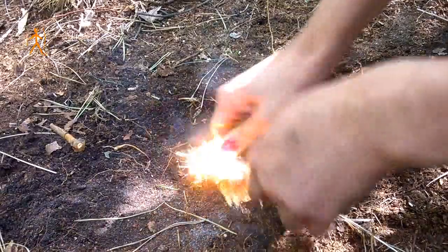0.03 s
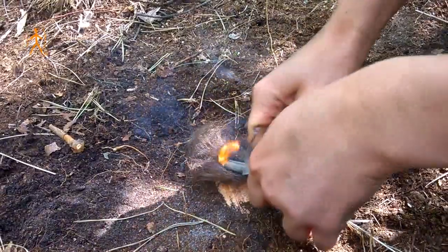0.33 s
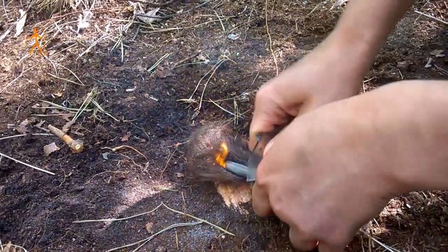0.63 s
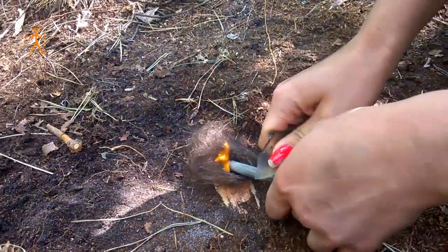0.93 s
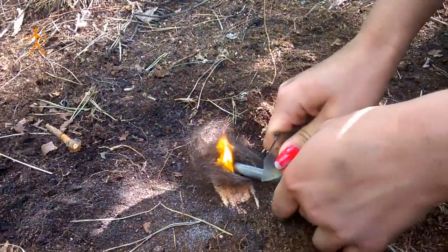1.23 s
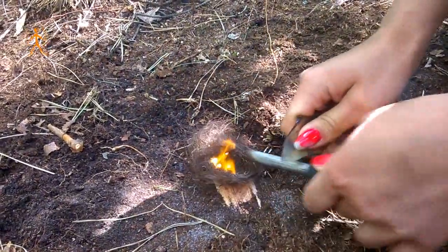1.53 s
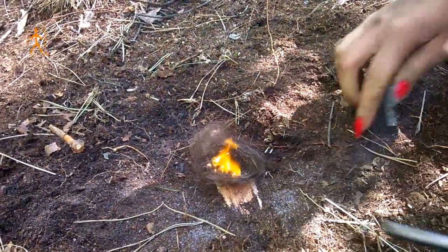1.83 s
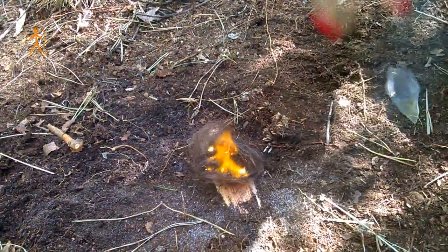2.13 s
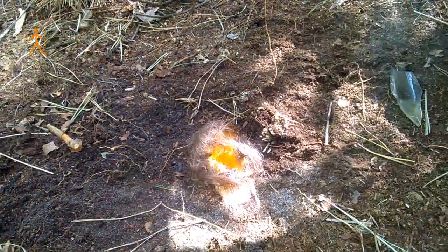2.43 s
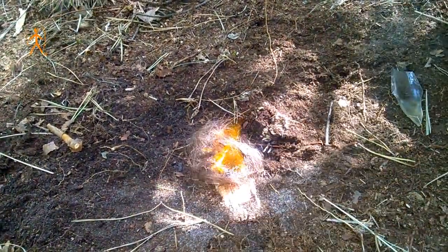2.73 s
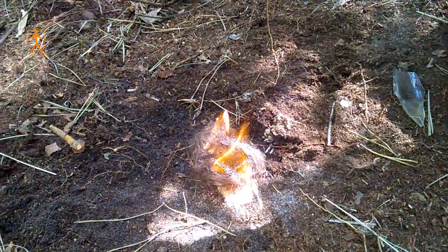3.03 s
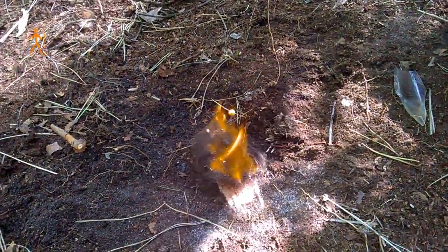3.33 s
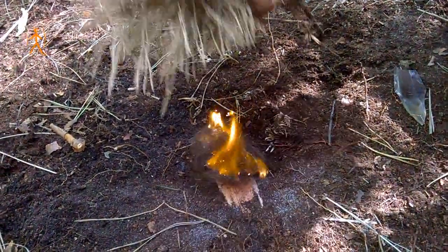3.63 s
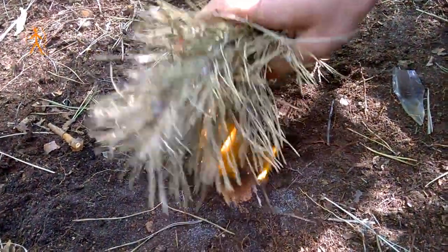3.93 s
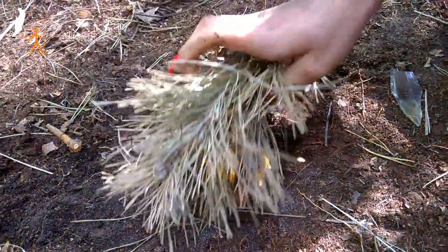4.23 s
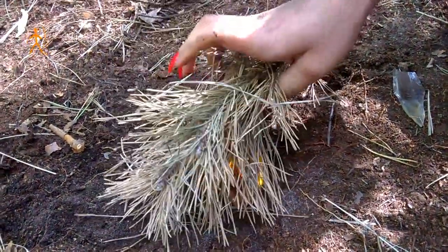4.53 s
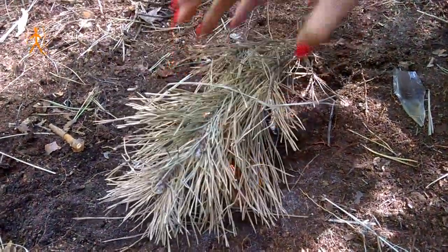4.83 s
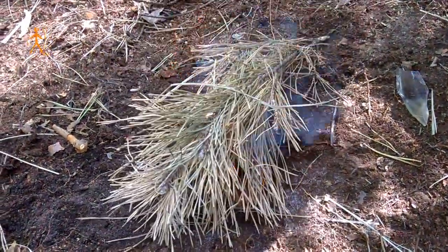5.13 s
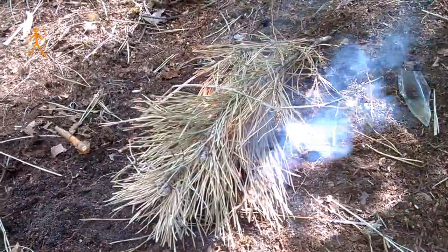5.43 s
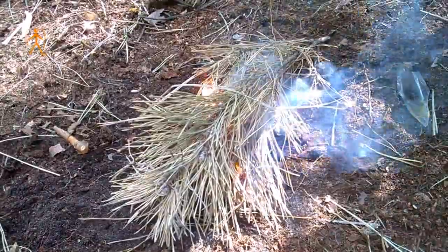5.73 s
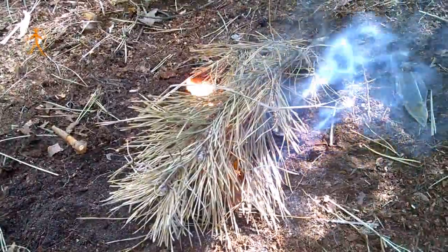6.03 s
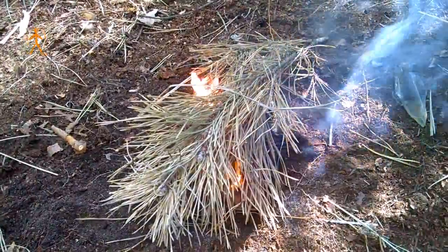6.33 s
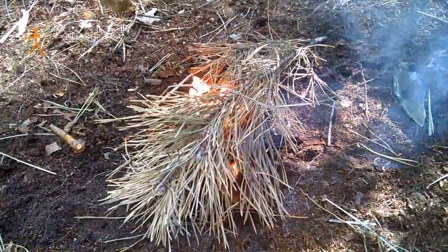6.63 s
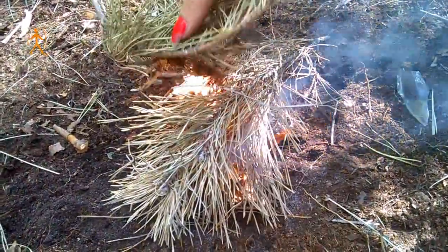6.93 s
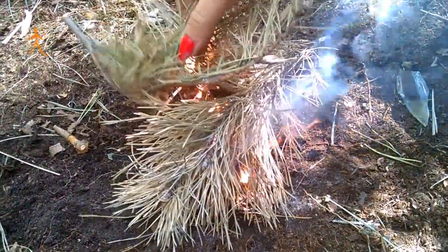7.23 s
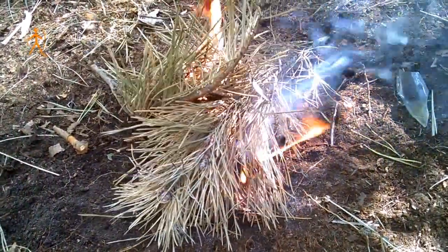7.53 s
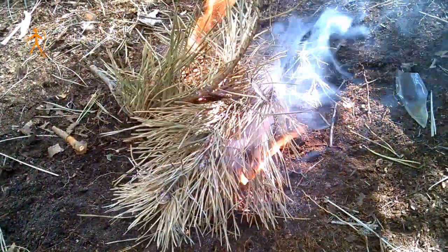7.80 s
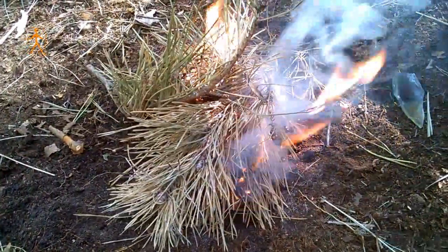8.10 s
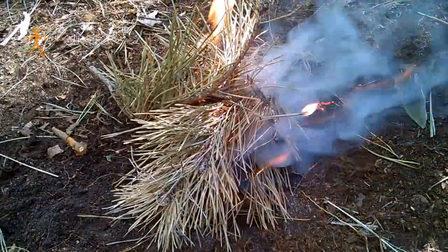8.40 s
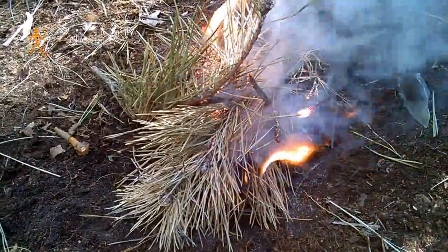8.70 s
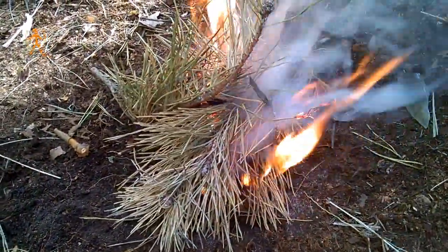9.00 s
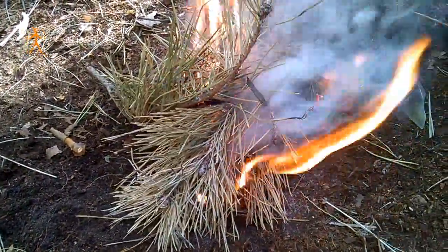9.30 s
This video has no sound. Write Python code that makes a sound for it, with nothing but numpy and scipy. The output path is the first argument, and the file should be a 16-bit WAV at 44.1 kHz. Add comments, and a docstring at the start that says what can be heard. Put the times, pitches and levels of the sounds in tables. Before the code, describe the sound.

In a quiet forest, a fire steel is struck once right by the microphone, with a few lighter scrapes and clicks after it. A hushed stretch follows, with softly hissing tinder and a far-off bird. Then pine needles begin to snap and pop, the crackle thickening as the flames flutter and sap sputters, while a bird sings a falling phrase among the trees.

```python
"""Lighting a fire on the forest floor

Close to one microphone, a blade scrapes a fire steel, ringing the rod, and lights a nest of tinder.
Dry conifer twigs laid on it catch: needles pop, sap spits, and puffs of gas make the flames flutter
ever more often. Back among the trees a bird whistles a falling phrase and another calls far off,
over still air and a faint low drone."""
import sys
import numpy as np
from scipy import signal
from scipy.fft import rfft, irfft, next_fast_len
from scipy.io import wavfile
from scipy.ndimage import uniform_filter1d

SR = 44100
rng = np.random.default_rng(int(sys.argv[2]) if len(sys.argv) > 2 else 0)


def inscribe(sig):
    """Save sig as 16-bit PCM at rate SR to the path in sys.argv[1].

    A 1-D sig is mono; a 2-D sig holds one channel per row.
    Samples are clipped to [-1, 1] before scaling.
    """
    pcm = np.round(np.clip(np.atleast_2d(sig).T, -1, 1) * 32767)
    wavfile.write(sys.argv[1], SR, pcm.astype(np.int16))


N = 412776
TIME = np.arange(N) / SR
TWIGS_LAID_S, CATCH_START_S, CATCH_END_S = 4.15, 4.6, 7.3   # the twigs smoulder, then the fire spreads

# still air among the trees: f/Hz, level/dB
AIR_SPECTRUM = [(200, -7.5), (400, -9), (1000, -4), (2000, -6), (2800, -4.5), (3800, -4), (5100, 0.5),
                (6200, -12.5), (8500, -19.5), (16000, -28)]
# song, in runs of like syllables: t/s, count, period/s, length/s, start, middle and end f/Hz, level/dB
SONG_RUNS = [(6.205, 1, .2, .055, 6150, 5850, 5150, -66), (6.32, 2, .2, .13, 4800, 5300, 4300, -63.5),
             (6.74, 3, .195, .075, 6450, 5150, 4250, -62), (7.305, 3, .171, .093, 3820, 4060, 3660, -54),
             (7.83, 2, .178, .088, 4850, 3680, 2950, -63)]
# the distant bird: t/s, length/s, start, middle and end f/Hz, level/dB
FAR_SYLLABLES = [(.64, 0.14, 4590, 5150, 4930, -63.5), (.81, 0.056, 5400, 5020, 4660, -63.5),
                 (2.61, 0.121, 4630, 5200, 4970, -61), (2.78, 0.049, 5400, 5100, 4430, -60)]

# vigour of the flames: t/s, level/dB
VIGOUR = [(0.6, -78), (1.4, -76), (1.94, -67.5), (2.31, -70), (4.77, -64.5), (5.19, -71), (5.67, -75.5),
          (7.45, -61), (8.84, -65), (9.36, -61)]
# low rumble of flames and air: f/Hz, level/dB
RUMBLE_SPECTRUM = [(15, -7), (35, 2.5), (75, -2), (140, -5.5), (220, -10), (400, -22.5), (1500, -47)]
# rush of the flames: f/Hz, level/dB
RUSH_SPECTRUM = [(200, -12), (280, -0.5), (380, 2), (700, 2), (980, 3), (1300, -3.5), (1650, -3),
                 (2000, -2.5), (2800, -14), (3900, -3), (5600, -12.5), (7000, -8.5), (8500, -36)]
# fine hiss of the fuel: f/Hz, level/dB
HISS_SPECTRUM = [(3000, -8), (4000, 12.5), (5600, 8), (7000, 10), (8200, 0), (9300, 1.5), (10800, -4),
                 (13000, 6.5), (14500, 7), (16000, -1.5)]
# the tinder flares, then the needles steam: peak t/s, rise/s, fall/s, level/dB
HISS_SWELLS = [(4.3, 2.9, 1, -68), (6.2, 0.19, 0.18, -69)]
# the biggest pockets of gas catching: middle t/s, length/s, flutter level/dB, thud level/dB
BIG_PUFFS = [(4.913, 0.0049, -51, -41), (5.488, .007, -60, -53), (5.737, 0.0081, -57.5, -53),
             (6.293, 0.0095, -54.5, -41.5), (6.594, 0.012, -54, -53), (6.728, 0.021, -57, -51),
             (6.813, 0.031, -47.5, -45.5), (7.139, 0.019, -56, -42.5), (7.284, 0.044, -52, -46),
             (7.456, 0.0073, -48.5, -47), (7.806, 0.0034, -45.5, -40), (7.856, 0.016, -62, -43.5),
             (8.121, 0.0077, -56, -40.5), (8.2, 0.021, -51, -44.5), (8.443, 0.012, -51.5, -48),
             (8.524, 0.021, -51, -50), (8.821, 0.0052, -51, -41.5), (8.988, 0.024, -50.5, -50.5),
             (9.286, 0.061, -54, -47.5)]
# flutter of a puff: f/Hz, level/dB
FLUTTER_SPECTRUM = [(120, -2), (280, -3), (400, -1.5), (550, 2.5), (750, -5.5), (1020, 0.5), (1300, -16),
                    (2000, -12), (2700, -35), (6000, -45)]
# thud under a puff: f/Hz, level/dB
THUD_SPECTRUM = [(25, -3.5), (60, -5), (110, 4), (200, -3), (320, -11.5), (700, -55)]
# steam from burst needles: middle t/s, length/s, level/dB, f/Hz
STEAM_SPITS = [(8.88, .014, -59, 7900), (9.076, 0.023, -51.5, 6240), (9.269, 0.006, -38, 4030),
               (9.27, 0.066, -50.5, 4030)]
# the loudest needles bursting: t/s, crack level/dB, ring f/Hz, knock level/dB
NEEDLE_POPS = [(4.2413, -55.5, 3900, -58), (4.373, -60, 4300, -67), (4.7515, -61, 4300, -57.5),
               (4.811, -61, 4860, -54), (4.8441, -48, 3840, -43), (4.8843, -48.5, 4300, -47),
               (4.901, -50.5, 4580, -58), (4.9097, -50.5, 4170, -54), (5.0669, -41.5, 4230, -49),
               (5.182, -52.5, 3980, -61), (5.7378, -52, 4230, -60), (5.7708, -59.5, 5260, -71),
               (5.876, -58.5, 4500, -56.5), (6.1145, -52, 4370, -58), (6.1864, -44, 5900, -80),
               (6.2883, -42.5, 5150, -75), (6.5195, -58, 6500, -78), (6.6037, -49, 4160, -51.5),
               (6.817, -45, 6000, -51.5), (6.9682, -48.5, 4430, -64), (6.9809, -49.5, 4200, -57.5),
               (7.135, -47.5, 4130, -56), (7.2955, -44, 4140, -54.5), (7.3815, -55, 4100, -64),
               (7.5353, -45.5, 3800, -56), (7.6812, -46, 4100, -69), (7.689, -44.5, 4300, -75),
               (7.799, -48, 3930, -54), (7.8434, -40, 4700, -52.5), (8.2602, -49.5, 3900, -49),
               (8.4873, -47.5, 4720, -55), (8.8157, -55, 6440, -48), (8.86, -30.5, 5600, -61),
               (8.893, -47, 6430, -67), (9.0472, -49.5, 4970, -55.5), (9.0766, -45.5, 5470, -56),
               (9.2157, -45, 4800, -48), (9.2681, -58, 3900, -53)]
# crack of a needle: f/Hz, level/dB
CRACK_SPECTRUM = [(1500, -4.5), (2700, -12), (3300, -0.5), (4200, 2), (5400, -6.5), (6600, -2),
                  (8000, -7.5), (9200, -7), (11000, -12.5), (15000, -14.5)]
# woody knock under a pop: f/Hz, level/dB
KNOCK_SPECTRUM = [(150, -17), (500, -2.5), (750, -5), (1000, 2), (1300, -3.5), (1600, -3), (2050, -1),
                  (2700, -9.5), (5000, -36)]

# one push down the rod, then two grazes: slip-off t/s, level/dB
BLADE_STROKES = [(.211, -21), (0.342, -43.5), (.683, -59)]
# rasp of a stroke: f/Hz, level/dB
RASP_SPECTRUM = [(250, -25.5), (550, -18.5), (1000, -5.5), (1400, -11), (2000, -7.5), (2800, -33),
                 (3400, -10.5), (4300, -4), (4900, -3.5), (5600, -17.5), (7200, -12.5), (8200, -18),
                 (9400, -13.5), (16000, -34.5)]
# resonances of rod and blade: f/Hz, width/Hz, level/dB
ROD_MODES = [(2000, 70, -12), (2650, 70, -13.5), (3290, 57, -7.5), (3700, 25, -5), (4360, 35, -8)]
# the blade sliding lightly back up: start t/s, end t/s, level/dB, first and last squeak f/Hz
BLADE_SLIDES = [(-.02, 0.033, -56.5, 2007, 2501), (0.318, 0.507, -51.5, 1202, 2654)]
# rub of the sliding blade: f/Hz, level/dB
RUB_SPECTRUM = [(290, -72), (500, -34.5), (1060, -5.5), (1310, -20), (1530, -9), (2070, -6), (2320, -9),
                (3420, -10.5), (4100, -3), (5420, -24), (6780, -21.5), (7900, -32), (10600, -50),
                (14000, -46.5)]
# the blade catching on the rod: t/s, level/dB, ring f/Hz
BLADE_CATCHES = [(0.2113, -20.5, 4300), (.328, -35.5, 4560), (0.3382, -47, 1310), (.3415, -47.5, 4360),
                 (0.3733, -37.5, 1290), (0.424, -50, 2020), (.488, -48, 3300), (0.5168, -38.5, 1710)]
# the hand meeting the ground: f/Hz, level/dB
BUMP_SPECTRUM = [(20, -2), (45, -4), (75, -16.5), (150, -2), (260, -15), (600, -28.5)]


def from_db(db):
    """Decibels to gain."""
    return 10 ** (np.asarray(db) / 20)


def rms_one(x):
    """Scale to an rms of 1."""
    return x / np.sqrt(np.mean(x ** 2) + 1e-20)


def at_level(hit, db):
    """Scale a short hit so that its energy, spread over 5 ms, has this level."""
    return hit * from_db(db) * np.sqrt(.005 * SR / np.sum(hit ** 2))


def add(track, s, sound):
    """Mix a sound into the track from time s."""
    start = int(np.clip(s * SR, 0, N - 1))
    track[start:start + len(sound)] += sound[:N - start]


def colour(x, spectrum):
    """Causal (minimum-phase) filter with the given spectrum."""
    size = 2 * next_fast_len(len(x) // 2 + 1024)
    hz, db = np.transpose(spectrum)
    log_hz = np.log(np.maximum(np.arange(size // 2 + 1) * SR / size, 1))
    cepstrum = irfft(np.log(from_db(np.interp(log_hz, np.log(hz), db))))
    cepstrum[1:size // 2] *= 2
    cepstrum[size // 2 + 1:] = 0
    return irfft(rfft(x, size) * np.exp(rfft(cepstrum)))[:len(x)]


def noise(spectrum):
    """Steady coloured noise of rms 1."""
    return rms_one(colour(rng.standard_normal(N), spectrum))


def drift(per_s):
    """A random wander of rms 1, with `per_s` new values a second."""
    knots = rng.standard_normal(int(N / SR * per_s) + 2)
    return rms_one(np.interp(TIME * per_s, np.arange(len(knots)), knots))


def tone(hz):
    """A sine that follows a pitch curve."""
    return np.sin(2 * np.pi * np.cumsum(hz) / SR)


def swell(s, width_s):
    """A bell-shaped rise and fall around time s."""
    return np.exp(-np.minimum(((TIME - s) / width_s) ** 2, 100))


def resonance(x, hz, width_hz):
    """Two-pole resonance with a peak gain of 1."""
    r = np.exp(-np.pi * width_hz / SR)
    poles = [1, -2 * r * np.cos(2 * np.pi * hz / SR), r * r]
    return signal.lfilter(np.array([1, 0, -1]) * (1 - r * r) / 2, poles, x)


def snap(splinter_db, decay_s, size=1024):
    """One sharp break followed by a dying spray of splinters."""
    x = from_db(splinter_db) * rng.standard_normal(size) * np.exp(-TIME[:size] / decay_s)
    x[0] += rng.choice([-1, 1])
    return x


def grit(per_s, spread_db):
    """Dense clicks of uneven size."""
    sizes = from_db(spread_db * np.minimum(rng.exponential(1, N), 3))
    return (rng.random(N) < per_s / SR) * sizes * rng.choice([-1, 1], N)


def scatter(x, t60):
    """A diffuse tail of many small reflections, as strong as the sound itself."""
    tail = rng.standard_normal(SR) * from_db(-60 * TIME[:SR] / t60)
    return signal.fftconvolve(x, tail / np.sqrt(np.sum(tail ** 2)))[:N]


def as_twigs_catch(before, after):
    """Move from one value to the other while the fire spreads through the twigs."""
    return np.interp(TIME, [CATCH_START_S, CATCH_END_S], [before, after])


def chance_moments(per_s):
    """Random sample positions at the given rate, once the twigs lie on the flame."""
    return np.flatnonzero((rng.random(N) < per_s / SR) & (TIME > TWIGS_LAID_S))


def forest_air():
    """Still air all round the microphone and a wavering drone far away."""
    drone = rms_one(tone(hz=53.8 + 1.576 * drift(18)))
    air = from_db(-69.5) * noise(AIR_SPECTRUM) + from_db(-65.5) * noise(RUMBLE_SPECTRUM)
    return air + from_db(-63.5 + 2.6 * drift(11)) * drone


def whistles(syllables, rasp):
    """Each syllable bends through three pitches; rasp (0-1) spreads its line into a buzzy band."""
    out = np.zeros(N)
    waver = 1 + .006 * drift(200)
    buzz = np.sqrt(1 - rasp) + np.sqrt(rasp) * drift(950)
    for s, length, *pitches_hz, db in syllables:
        progress = np.linspace(0, 1, int(length * SR))
        span = int(s * SR) + np.arange(len(progress))
        bend_hz = uniform_filter1d(np.interp(progress, [0, .4, 1], pitches_hz), size=len(span) // 4)
        breath = np.sqrt(2 * np.abs(np.sin(np.pi * progress)))
        add(out, s, from_db(db) * breath * buzz[span] * tone(bend_hz * waver[span]))
    return out


def birds():
    """One bird sings among the trunks; the far one reaches the microphone only as echo."""
    song = [(s + k * period, *shape) for s, count, period, *shape in SONG_RUNS for k in range(count)]
    clear, husky = whistles(song, rasp=0), whistles(song, rasp=.75)
    far = whistles(FAR_SYLLABLES, rasp=.86)
    fading = from_db(-1 + 2.5 * drift(70))   # paths of unequal length make the song fade in and out
    echoes = from_db(-.7) * scatter(husky, t60=.5) + from_db(-1.5) * scatter(far, t60=.55)
    return fading * clear + echoes


def flames():
    """Rumble, rush and fine hiss; the flame grows deeper and unsteady once the twigs burn."""
    flicker_db = as_twigs_catch(.8, 2.5) * drift(70)
    blaze_db = np.interp(TIME, *np.transpose(VIGOUR)) + flicker_db
    rumble = from_db(blaze_db + as_twigs_catch(3.5, 8)) * noise(RUMBLE_SPECTRUM)
    rush = from_db(blaze_db + as_twigs_catch(.5, -1)) * noise(RUSH_SPECTRUM)
    flares = sum(from_db(db) * swell(s, np.where(TIME < s, rise, fall))
                 for s, rise, fall, db in HISS_SWELLS)
    twig_gain = from_db(as_twigs_catch(-95.5, -77))
    hiss = np.hypot(flares, twig_gain) * from_db(.6 * drift(90)) * noise(HISS_SPECTRUM)
    return rumble + rush + hiss


def gas_puffs():
    """Gas flares up in short bursts, big and small: a fluttering rush over a low thud."""
    out = np.zeros(N)
    flutter, thud = noise(FLUTTER_SPECTRUM), noise(THUD_SPECTRUM)
    puffs, small_db = list(BIG_PUFFS), as_twigs_catch(-57.5, -51.5)
    for i in chance_moments(per_s=as_twigs_catch(3, 7.4)):
        length = .014 * 2 ** rng.normal(0, .5)
        thud_db = small_db[i] - rng.normal(0, 1)
        puffs.append((i / SR, length, thud_db - 4, thud_db))
    for s, length, flutter_db, thud_db in puffs:
        span = slice(int((s - 2 * length) * SR), int((s + 2 * length) * SR))
        flare = np.exp(-((TIME[span] - s) / (.74 * length)) ** 2)
        for source, db in (flutter, flutter_db), (thud, thud_db):
            burst = flare * source[span]
            out[span] += from_db(db) * burst * np.sqrt(length * SR / np.sum(burst ** 2))
    return out


def sap_spits():
    """Boiling sap sputters through a split in a needle: a short, gritty hiss."""
    sputter = colour(grit(per_s=2500, spread_db=5), CRACK_SPECTRUM)
    return sum(from_db(db) * swell(s, length / 2) * rms_one(resonance(sputter, hz, hz / 4))
               for s, length, db, hz in STEAM_SPITS)


def needle_crack(hz, db):
    """A needle splits: a click and a brief ring, sharper when high-pitched, blunter when big."""
    burst = snap(splinter_db=-29.5, decay_s=.0034)
    ring = resonance(burst, hz, width_hz=1600)
    click = from_db(-7) * (hz / 5000) ** 2 * burst
    cutoff_hz = np.clip(2.6 * hz * from_db(-.25 * (db + 44)), 6000, 18000)
    direct = signal.lfilter(*signal.butter(2, cutoff_hz, fs=SR), colour(ring + click, CRACK_SPECTRUM))
    # the ground sends it back a moment later, depending on the needle's height
    lag = int(rng.uniform(.0016, .0021) * SR)
    echo = from_db(-7) * np.pad(direct, (lag, 0))[:len(direct)]
    return at_level(direct + echo, db)


def crackling():
    """Loud pops and a spray of small ticks that thickens as the fire spreads, scattered by the twigs."""
    out = np.zeros(N)
    for s, crack_db, hz, knock_db in NEEDLE_POPS:
        knock = colour(snap(splinter_db=-20.5, decay_s=.0041), KNOCK_SPECTRUM)
        add(out, s, needle_crack(hz, crack_db) + at_level(knock, knock_db))
    tick_db = as_twigs_catch(-72, -64.5)
    for i in chance_moments(per_s=as_twigs_catch(10, 58)):
        add(out, i / SR, needle_crack(hz=rng.uniform(3700, 6000), db=tick_db[i] + rng.normal(0, 6)))
    return out + from_db(-14) * scatter(out, t60=.07)


def blade_catches():
    """The blade snags on the rod with small, ringing knocks."""
    out = np.zeros(N)
    for s, db, hz in BLADE_CATCHES:
        ring = resonance(snap(splinter_db=-19, decay_s=.0015), hz, width_hz=1100)
        add(out, s, at_level(colour(ring, RUB_SPECTRUM), db))
    return out


def blade_slides(touch_s=.014, judder_rise_s=.0023, judder_fall_s=.023):
    """The blade rubs back up the rod with a hoarse, rising squeak, juddering around each catch."""
    judder, gain, squeak_hz = np.zeros((3, N))
    for s, db, _ in BLADE_CATCHES:
        decay = np.maximum((s - TIME) / judder_rise_s, (TIME - s) / judder_fall_s)
        judder += from_db(db - 10) * np.exp(-np.minimum(decay, 20))
    for start, end, db, first_hz, last_hz in BLADE_SLIDES:
        contact = np.interp(TIME, [start - touch_s, start, end, end + touch_s], [0, 1, 1, 0]) ** 2
        gain += contact * np.hypot(from_db(db), judder)
        squeak_hz += (contact > 0) * np.interp(TIME, [start, end], [first_hz, last_hz])
    squeak = drift(1300) * tone(squeak_hz)
    rub = rms_one(colour(grit(per_s=1000, spread_db=1), RUB_SPECTRUM))
    return gain * from_db(2 * drift(200)) * (rub + from_db(2.5) * squeak)


def blade_strokes(shavings, push_s=.076, slip_drop_db=7, spark_fade_db_per_s=276):
    """Shaving rings rod and blade; the rasp swells until the blade slips off and the sparks fizz out."""
    gain = np.zeros(N)
    for s, db in BLADE_STROKES:
        push = np.clip(1 + (TIME - s) / push_s, 0, 1) ** 3.1
        sparks = from_db(-slip_drop_db - spark_fade_db_per_s * np.clip(TIME - s, 0, 1))
        gain += from_db(db) * np.where(TIME < s, push, sparks)
    ringing = sum((-1) ** k * from_db(db) * resonance(shavings, hz, width)
                  for k, (hz, width, db) in enumerate(ROD_MODES))
    rasp = rms_one(colour(shavings, RASP_SPECTRUM)) + from_db(-5.5) * rms_one(ringing)
    dull = signal.sosfiltfilt(signal.butter(2, 6500, fs=SR, output="sos"), rasp)
    bite = (gain / from_db(-28)) ** .3   # only a hard-pressed blade cuts deep enough to sound bright
    return gain * (dull + bite * (rasp - dull))


def fire_steel(edge_hz=10400):
    """Close up: the blade scrapes down the rod, the hand bumps the ground, the blade slides back."""
    shavings = grit(per_s=5000, spread_db=4)
    blade = blade_strokes(shavings) + blade_slides() + blade_catches()
    # the blade's edge sings thinly in mid-slide
    edge_ring = resonance(resonance(shavings, edge_hz, width_hz=1100), edge_hz, width_hz=1100)
    edge = from_db(-68) * swell(s=.446, width_s=.04) * rms_one(edge_ring)
    bump = from_db(-41.5) * swell(s=.228, width_s=.044) * noise(BUMP_SPECTRUM)
    return blade + edge + bump


def scene():
    """One microphone close to the tinder, with the forest behind."""
    fire = crackling() + sap_spits() + gas_puffs() + flames()
    return (fire_steel() + fire + birds() + forest_air())[None]


def record(dry):
    """The treble is cut steeply above 16.1 kHz."""
    return signal.sosfilt(signal.ellip(12, .1, 80, 16100, fs=SR, output="sos"), dry)


dry = scene()
out = record(dry)
inscribe(out)
```